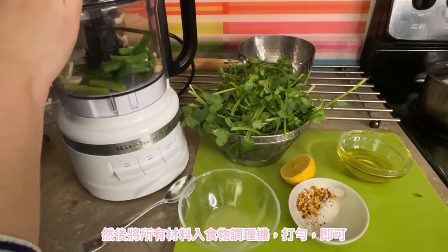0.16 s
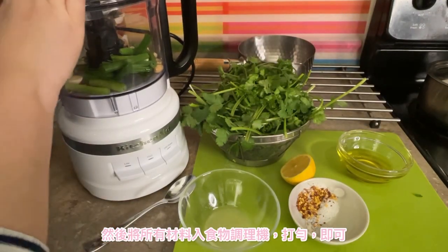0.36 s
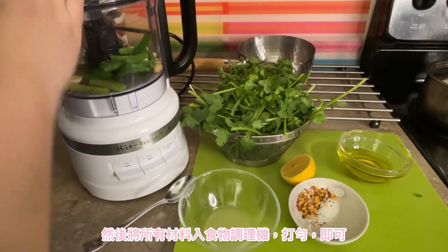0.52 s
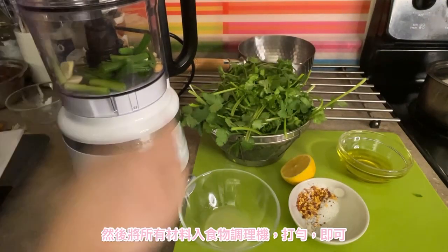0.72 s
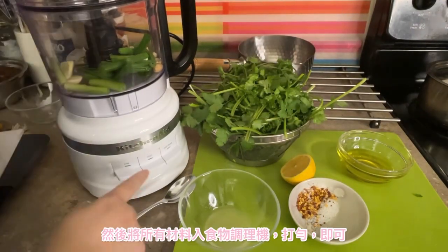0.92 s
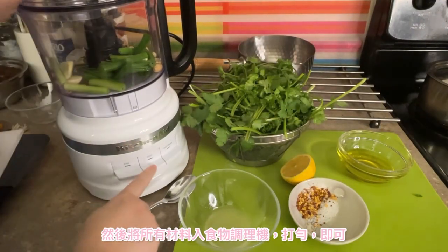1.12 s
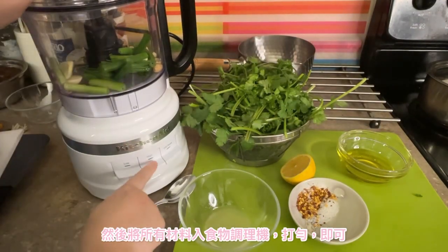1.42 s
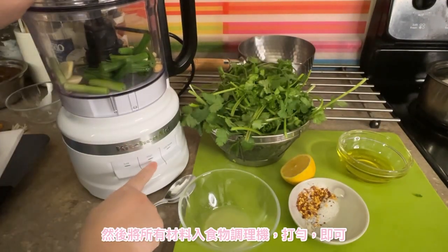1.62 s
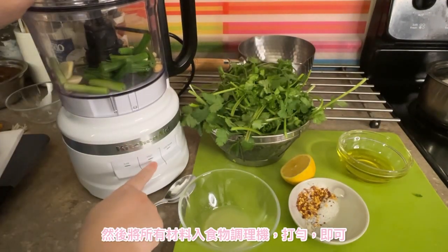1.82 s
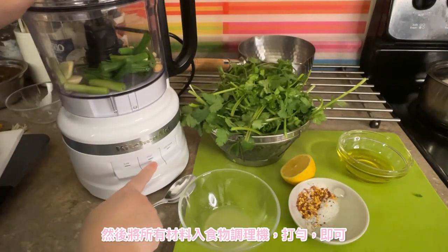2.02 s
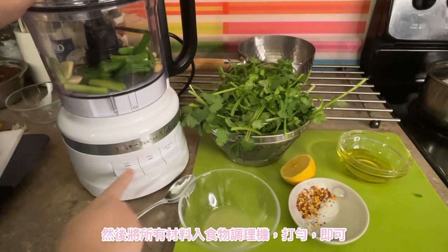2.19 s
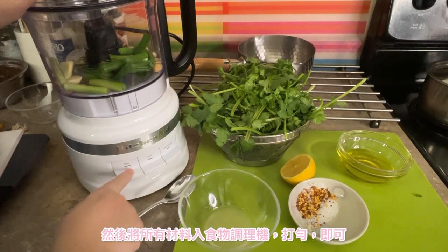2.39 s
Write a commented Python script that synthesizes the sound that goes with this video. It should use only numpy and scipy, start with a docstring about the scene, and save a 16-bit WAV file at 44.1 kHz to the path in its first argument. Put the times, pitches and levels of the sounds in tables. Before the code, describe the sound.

Plastic food processor lid snaps shut with a loud clack, then faint handling in a kitchen

```python
"""Kitchen worktop: the lid of a plastic food processor is twisted shut and the room rings.
The lid scrapes and snaps: swelling noise, then noise cracks with decaying sine modes and a low thud.
The base bumps softly (modes near each push's pitch); ticks, rubs and squeaks are coloured noise.
A fingertip drags over the buttons: noise through the panel's resonances. The motor stays off.
A low wavering hum and faint air continue throughout; decaying noise in bands makes the reverberation."""
import sys
import numpy as np
from scipy import signal
from scipy.fft import rfft, irfft, next_fast_len
from scipy.io import wavfile

SR = 44100
rng = np.random.default_rng(int(sys.argv[2]) if len(sys.argv) > 2 else 0)


def dump_mix(stems):
    """Bounce the given channels to the path in sys.argv[1] as a 16-bit WAV at rate SR."""
    frames = np.atleast_2d(stems).T  # one column per channel
    limited = np.clip(frames, -1, 1)  # hard clip at full scale
    pcm = np.round(limited * 32767).astype(np.int16)
    wavfile.write(sys.argv[1], SR, pcm)


N = 112454
T = np.arange(N) / SR
FFT_SIZE = next_fast_len(N, real=True)
HZ = np.maximum(np.fft.rfftfreq(FFT_SIZE, 1 / SR), 1)
HALF_S = SR // 2   # samples in half a second


def amp(db):
    """Decibels to gain."""
    return 10 ** (np.asarray(db) / 20)


def at_hz(points, hz):
    """Read a table on a log-frequency axis."""
    f, v = np.transpose(points)
    return np.interp(np.log(hz), np.log(f), v)


def pan(left_minus_right_db):
    """Left and right gains for a level difference."""
    return amp(np.array([[.5], [-.5]]) * left_minus_right_db)


def dying(t, t60_s):
    """Silent before t = 0, then an exponential decay."""
    return (t >= 0) * np.exp(-np.log(1000) * np.maximum(t, 0) / t60_s)


def drift(rate_hz):
    """Slow random motion of spread 1."""
    spectrum = rfft(rng.standard_normal(FFT_SIZE))
    motion = irfft(spectrum / (1 + (HZ / rate_hz) ** 2))[:N]
    return motion / motion.std()


# Left-right likeness of noise: [hz, likeness (0..1)]
LIKENESS = [(150, 0.61), (400, 1), (1200, 0.0027), (4000, .1), (11000, 0.1)]
# Lean to the left: [hz, left_minus_right_db]
LEFTWARD = [(100, 1.5), (500, 4), (1200, 4), (2100, 2), (4000, 7), (6700, 8), (9500, 0)]


def noise(colour_db, left_share=1):
    """Stereo noise of rms 1 with the given colour, wider in the treble and leaning left."""
    mid, side = rfft(rng.standard_normal((2, FFT_SIZE)))
    alike = np.clip(at_hz(LIKENESS, HZ), -.99, .99)
    both = np.sqrt(1 + alike) * mid + np.sqrt(1 - alike) * side * [[1], [-1]]
    lean = pan(left_share * at_hz(LEFTWARD, HZ))
    coloured = irfft(both * amp(colour_db) * lean)[:, :N]
    return coloured / coloured.std()


def tilted(points, tilt_db_per_octave):
    """A contact's colour, tipped about 2 kHz (flat below 700 Hz) and with no deep bass."""
    tilt_db = tilt_db_per_octave * np.log2(np.maximum(HZ, 700) / 2000)
    bass_loss_db = 10 * np.log10(1 + (150 / HZ) ** 4)
    return at_hz(points, HZ) + tilt_db - bass_loss_db


SWELL_CYCLES = .6   # time constant of a mode's build-up


def ring(t, hz, t60_s):
    """One struck mode; low modes swell later than high ones."""
    swell = 1 - np.exp(-np.maximum(t, 0) * hz / SWELL_CYCLES)
    return np.sin(2 * np.pi * hz * t) * dying(t, t60_s) * swell * pan(at_hz(LEFTWARD, hz))


def peak(hz, width_hz):
    """A resonance curve of height 1."""
    return 1 / (1 + (2 * (HZ - hz) / width_hz) ** 2)


STROKE_ATTACK_S, FRICTION_ROUGH, ROUGH_HZ = 0.028, 0.18, 98


def stroke(start_s, length_s, t60_s):
    """A stroke swells, holds unevenly and dies."""
    swell = np.clip((T - start_s) / STROKE_ATTACK_S, 0, 1)
    fall = dying(np.maximum(T - start_s - length_s, 0), t60_s)
    return swell * fall * np.exp(FRICTION_ROUGH * drift(ROUGH_HZ))


# Low hum tones: [pitch_hz, level_db]
HUM = [(27.5, -66.5), (75.4, -69.5)]
HUM_WAVER = .3   # spread of phase in radians and of level as a share
HUM_LEVEL_RATE_HZ = 4.5
# Room air colour, relative: [hz, db_per_hz]
AIR = [(25, -12.5), (48, -10), (80, -4.5), (125, -18), (350, -27), (700, -34.5), (1560, -38), (4000, -46),
       (9000, -48.5), (12500, -55.5)]
AIR_DB, AIR_LEFT_SHARE = -65.5, .3


def room_tone():
    """Faint air as coloured noise, and low sines wavering in phase and level."""
    out = amp(AIR_DB) * noise(at_hz(AIR, HZ), AIR_LEFT_SHARE)
    for hz, level_db in HUM:
        tone = np.sqrt(2) * np.sin(2 * np.pi * hz * T + HUM_WAVER * drift(hz / 10))
        level = amp(level_db) * (1 + HUM_WAVER * drift(HUM_LEVEL_RATE_HZ))
        out = out + tone * level * pan(at_hz(LEFTWARD, hz))
    return out


# Hand sliding over the housing: [start_s, length_s, level_db, tilt_db_per_octave]
RUBS = [(0.0, 0.07, -65.5, -4), (0.476, 0.096, -60, 3), (0.886, 0.087, -69, -1.5), (1.037, 0.061, -66, -1)]
# Colour of skin on plastic, relative: [hz, db_per_hz]
RUB = [(200, 3.5), (1300, -0.5), (4300, -9), (7500, -11), (11000, -10.5), (13000, -12.5)]
RUB_T60_S = 0.25


def rubs():
    """Skin on plastic, one hiss for each stroke."""
    out = 0
    for start_s, length_s, level_db, tilt_db in RUBS:
        hiss = noise(tilted(RUB, tilt_db))
        out = out + amp(level_db) * stroke(start_s, length_s, RUB_T60_S) * hiss
    return out


# Faint squeaks and swishes: [start_s, length_s, level_db, centre_hz, width_octaves]
SWISHES = [(0.0, 0.041, -71, 4100, 0.3), (0.682, 0.056, -61.5, 3480, 0.89),
           (1.212, 0.073, -78.5, 6840, 0.15), (1.272, .075, -76.5, 4720, 0.06),
           (1.518, 0.075, -78, 6050, 0.19), (1.533, 0.071, -78.5, 4780, .04),
           (1.846, 0.038, -77.5, 4860, 0.054), (2.417, 0.016, -79.5, 4770, .035),
           (2.458, .07, -80.5, 8300, .09)]
SWISH_T60_S = .26


def swishes():
    """Thin high squeaks and hisses, narrow-band noise, while the hand moves about the machine."""
    out = 0
    for start_s, length_s, level_db, centre_hz, octaves in SWISHES:
        colour_db = -20 * np.log10(1 + (np.log2(HZ / centre_hz) / octaves) ** 2)
        out = out + amp(level_db) * stroke(start_s, length_s, SWISH_T60_S) * noise(colour_db)
    return out


# Soft pushes on the base: [start_s, level_db, most_excited_pitch_hz]
BUMPS = [(0.001, -36, 126), (0.05, -50, 163), (0.102, -42.5, 158.6), (0.395, -42, 65.4),
         (0.479, -33.5, 291), (0.502, -30.5, 70.7), (0.558, -42, 196), (0.706, -52, 270),
         (0.95, -40.5, 206), (0.976, -41, 65), (1.402, -43.5, 60), (1.50, -53, 62), (2.061, -46, 429)]
# Modes of the base on the worktop, level relative: [pitch_hz, level_db, t60_s]
BASE = [(72, -2, .12), (165, 2, .13), (250, -6, .07), (325, -1, .05), (480, -10, .06)]
BUMP_FALL_DB = 9   # loss one octave from the push's pitch, growing as octaves squared


def bumps():
    """The base rocks on its feet; each push wakes the modes near its own pitch."""
    out = np.zeros((2, N + SR))
    t = T[:HALF_S]
    for start_s, level_db, push_hz in BUMPS:
        start = max(int(start_s * SR), 0)
        for hz, mode_db, t60_s in BASE:
            loss_db = BUMP_FALL_DB * np.log2(hz / push_hz) ** 2
            out[:, start:start + len(t)] += amp(level_db + mode_db - loss_db) * ring(t, hz, t60_s)
    return out[:, :N]


# Kitchen reverberation, level relative: [hz, level_db, t60_s]
ROOM = [(100.4, -8.5, 0.99), (242, -7, 0.23), (520, -13, 0.47), (1140, -3.5, 0.48), (2156, -3.5, 0.39),
        (3974, -3.5, .47), (7100, -8, 0.34), (12030, -14.5, 0.35)]
ROOM_ONSET_S = 0.0021


def reverberation(start_s, colour_db, left_share):
    """A diffuse noise tail from start_s on, each octave dying at its own rate."""
    room, t = np.array(ROOM), T - start_s
    spectrum = rfft(noise(colour_db, left_share), FFT_SIZE) * amp(at_hz(room[:, :2], HZ))
    tail = 0
    for hz in 100 * 2. ** np.arange(8):
        band = np.clip(1 - abs(np.log2(HZ / hz)), 0, 1)
        t60_s = at_hz(room[:, ::2], hz)
        unit_energy = np.sqrt(2 * np.log(1000) / (t60_s * SR))
        tail = tail + irfft(spectrum * band)[:, :N] * dying(t, t60_s) * unit_energy
    return tail * (1 - np.exp(-np.maximum(t, 0) / ROOM_ONSET_S))


def kitchen(x):
    """The room's answer to a sound: convolution with one second of diffuse tail."""
    return signal.fftconvolve(x, reverberation(0, 0 * HZ, 0)[:, :SR], axes=1)[:, :N]


# Lid striking its catch, levels relative: [start_s, ring_db, crack_db, crack_tilt_db_per_octave]
SNAPS = [(0.2028, -17, -17.5, -3), (0.2069, -11.5, -26.5, -0.5), (0.2126, 3, -12, -4),
         (0.2141, -10, -9.5, -0.5), (0.2180, -2, -12, -6.5), (0.2208, -11.5, -14.5, -6)]
# Dense upper modes of the plastic, relative: [hz, db_per_hz]
CRACK = [(250, -8.5), (700, -4.5), (1250, 2), (2100, -6.5), (3000, -6), (4900, -4.5), (6300, -8),
         (8500, -17), (11000, -21.5), (13000, -20.5)]
SLIDE_DB, SLIDE_TILT_DB_PER_OCTAVE = -37, -5.0
SLIDE_SWELL_S = 0.061   # time to swell 60 dB


def scrape():
    """The lid scrapes up its ramp: noise swelling until the first strike."""
    swell = dying(SNAPS[0][0] - T, SLIDE_SWELL_S)
    return noise(tilted(CRACK, SLIDE_TILT_DB_PER_OCTAVE)) * amp(SLIDE_DB) * swell


# Modes of bowl and lid, level relative: [pitch_hz, level_db, t60_s]
BOWL = [(365, -22, 0.031), (473.5, -24, 0.16), (638.6, -30, 0.12), (740, -31.5, .08), (884, -31, 0.11),
        (1014, -25, .06), (1188, -15.5, 0.033), (1341, -27, 0.089), (3030, -24, .03), (4150, -23.5, 0.066),
        (4686, -26.5, 0.027), (5480, -30, 0.054)]
BOWL_LAG_S = 0.00042   # right channel later
CRACK_T60_S = .022
WOBBLE_SHARE, WOBBLE_HZ = .015, 140   # spread of the detuning and its rate
STRENGTH_SPREAD_DB = 1


def snaps():
    """Contacts, each a crack plus the bowl's modes, detuned by the chatter, at strengths of its own."""
    out = np.zeros((2, N))
    t = T[:HALF_S] - np.array([[0], [BOWL_LAG_S]])
    modes = []
    for hz, level_db, t60_s in BOWL:
        wobble_s = WOBBLE_SHARE * np.cumsum(drift(WOBBLE_HZ)[:HALF_S]) / SR
        modes.append(amp(level_db) * ring(t + wobble_s, hz, t60_s))
    signs = (-1) ** np.arange(len(BOWL))
    for start_s, ring_db, crack_db, tilt_db in SNAPS:
        strengths = amp(rng.normal(0, STRENGTH_SPREAD_DB, len(BOWL))) * signs
        start = int(start_s * SR)
        out[:, start:start + HALF_S] += amp(ring_db) * np.tensordot(strengths, np.array(modes), axes=1)
        out += amp(crack_db) * noise(tilted(CRACK, tilt_db)) * dying(T - start_s, CRACK_T60_S)
    return out


# Modes of the whole machine: [pitch_hz, level_db, t60_s]
THUD = [(104, -25, 0.17), (166.85, -36, 0.33), (250.7, -42, 0.04)]
THUD_AT_S = .208


def thud():
    """The jolt shakes the whole machine once, ringing its low modes."""
    return sum(amp(level_db) * ring(T - THUD_AT_S, hz, t60_s) for hz, level_db, t60_s in THUD)


LID_LOW_CUT_HZ = 60


def lid():
    """Scrape, snaps and thud together, high-passed to keep the lowest bass out."""
    low_cut = signal.butter(2, LID_LOW_CUT_HZ, "high", fs=SR, output="sos")
    return signal.sosfilt(low_cut, scrape() + snaps() + thud())


WASH_DB, WASH_TILT_DB_PER_OCTAVE, WASH_LEFT_SHARE = 7.5, 0.5, .5


def wash():
    """The loudest crack fills the room with a dense, smooth tail."""
    start_s = max(SNAPS, key=lambda row: row[2])[0]
    colour_db = tilted(CRACK, WASH_TILT_DB_PER_OCTAVE)
    return amp(WASH_DB) * reverberation(start_s, colour_db, WASH_LEFT_SHARE)


# Light ticks of plastic: [start_s, level_db, tilt_db_per_octave]
TICKS = [(0.331, -41, 2), (0.475, -52, -2), (0.659, -55, -2.5), (0.944, -60, -4), (1.029, -53, -12)]
TICK_T60_S = 0.06


def ticks():
    """Small contacts of the same plastic: short decaying noise."""
    out = 0
    for start_s, level_db, tilt_db in TICKS:
        out = out + amp(level_db) * noise(tilted(CRACK, tilt_db)) * dying(T - start_s, TICK_T60_S)
    return out


# Fingertip drags over the buttons: [start_s, length_s, level_db, button_hz, panel_stretch (ratio)]
DRAGS = [(2.05, 0.062, -69, 3320, 0.95), (2.088, 0.075, -68, 5040, 0.77), (2.139, 0.046, -66.5, 755, 1.3),
         (2.169, 0.046, -66, 1480, 0.953)]
# Button panel resonances before stretching: [centre_hz, width_hz, lift_db]
PANEL = [(4880, 430, 11.5), (6320, 1200, 12.5), (8230, 370, 13)]
DRAG_T60_S, DRAG_TILT_DB_PER_OCTAVE = 0.14, 2
BUTTON_WIDTH_HZ, BUTTON_LIFT_DB = 240, 12.5


def fingertip():
    """Friction coloured by the panel, whose resonances shift as the finger moves between buttons."""
    out = 0
    for start_s, length_s, level_db, button_hz, stretch in DRAGS:
        colour_db = tilted(RUB, DRAG_TILT_DB_PER_OCTAVE)
        colour_db = colour_db + BUTTON_LIFT_DB * peak(button_hz, BUTTON_WIDTH_HZ)
        for hz, width_hz, lift_db in PANEL:
            colour_db = colour_db + lift_db * peak(hz * stretch, width_hz)
        out = out + amp(level_db) * stroke(start_s, length_s, DRAG_T60_S) * noise(colour_db)
    return out


LID_ROOM_DB = -3.5   # lid sound sent to the room


def scene():
    """Everything happens at arm's length, a little to the left."""
    snap = lid()
    handling = rubs() + bumps() + ticks()
    room = kitchen(amp(LID_ROOM_DB) * snap + handling) + wash()
    return room_tone() + handling + swishes() + snap + room + fingertip()


OVERLOAD = 1   # full-scale ceiling
CUTOFF_HZ = 12629


def record(dry):
    """The loudest peaks are rounded and the top is cut."""
    rounded = OVERLOAD * np.tanh(dry / OVERLOAD)
    top_cut = signal.ellip(10, .3, 70, CUTOFF_HZ, fs=SR, output="sos")
    return signal.sosfilt(top_cut, rounded)


dry = scene()
out = record(dry)
dump_mix(out)
```